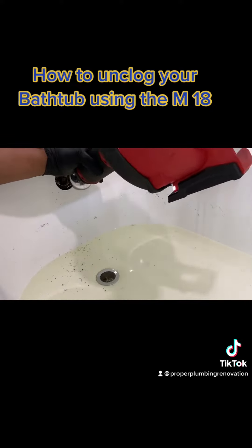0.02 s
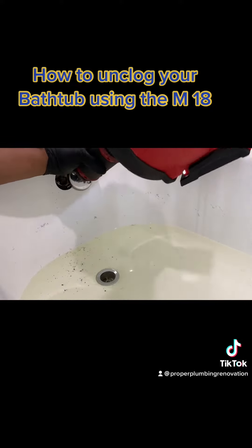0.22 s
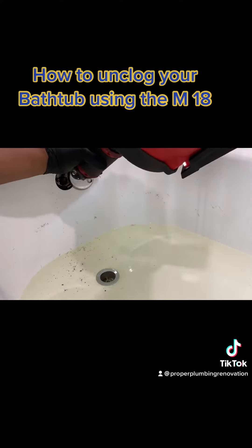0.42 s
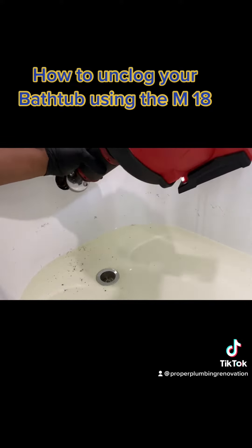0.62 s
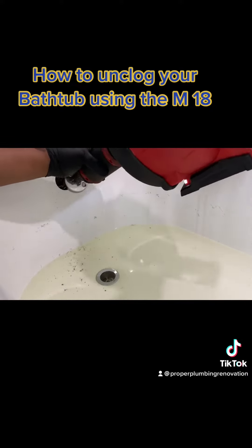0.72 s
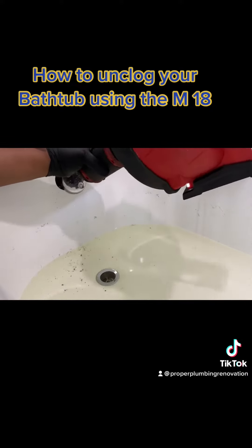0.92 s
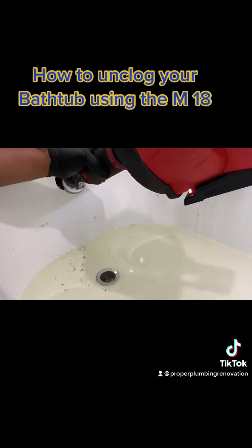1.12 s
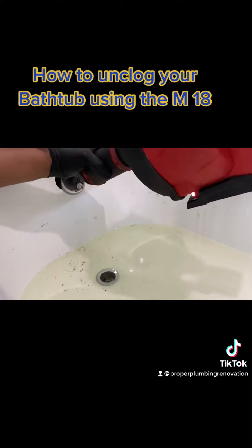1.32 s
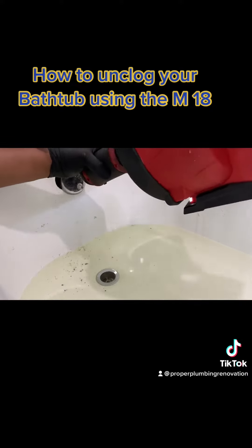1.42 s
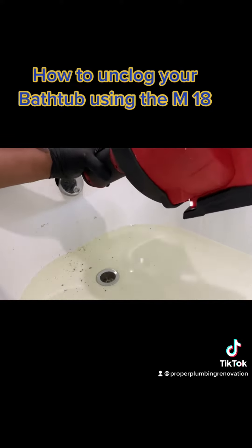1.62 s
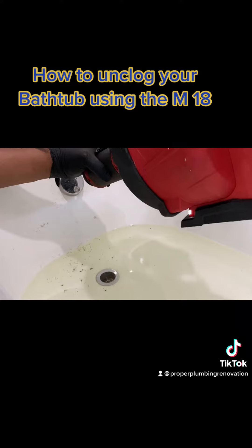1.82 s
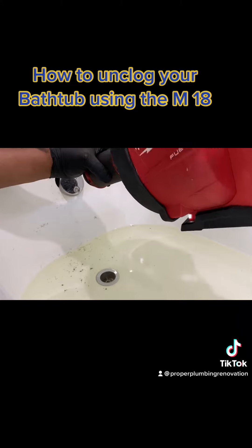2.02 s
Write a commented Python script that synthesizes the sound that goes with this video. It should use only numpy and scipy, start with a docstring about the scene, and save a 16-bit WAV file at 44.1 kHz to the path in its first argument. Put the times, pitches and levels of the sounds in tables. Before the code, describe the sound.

A cordless drain cleaning machine gives one short burst in a small tiled bathroom, close stereo microphone: trigger clicks, quick motor spin-up, steel cable slapping and scraping in the plastic drum, then slowing to a low fading ring.

```python
"""Drain machine burst in a bathroom

A cordless drain cleaning machine runs one short burst over a bathtub: motor tones, gear whirr and glides spin up.
The coiled steel cable, built from dense grains, slaps, scrapes, snaps and squeals in the turning plastic drum.
The drum stops, a low ring of decaying sines hangs on, and the small hard room, a noise tail, dies away."""
import sys
import numpy as np
from scipy import signal
from scipy.fft import rfft, irfft
from scipy.io import wavfile
from scipy.ndimage import uniform_filter1d

SR = 44100
rng = np.random.default_rng(int(sys.argv[2]) if len(sys.argv) > 2 else 0)


def to_wav(sig):
    """Store sig (one row per channel, or 1-D mono) as 16-bit WAV at the path in sys.argv[1].

    Samples outside -1..1 are clipped; the rate is SR.
    """
    pcm = np.clip(np.atleast_2d(sig), -1, 1) * 32767
    pcm = np.round(pcm).astype(np.int16)
    wavfile.write(sys.argv[1], SR, pcm.T)  # frames by channels


N = 92610
T = np.arange(N) / SR

# Cable slaps on the drum: [t/s, hold/s, drum boom level/dB, clatter level/dB, steel scrape level/dB]
CABLE_SLAPS = [(0, 0.0026, -41.5, -37.5, -45.5), (0.02, 0.098, -49.5, -58, -68.5),
               (0.179, 0.037, -46, -46.5, -54), (0.317, 0.0031, -20.5, -24.5, -37),
               (0.353, 0.014, -34, -26, -36), (0.391, 0.02, -27, -24, -42),
               (0.433, 0.036, -29, -23.5, -21.5), (0.481, 0.028, -47, -32, -32),
               (.531, .011, -26, -20, -20.5), (0.569, 0.016, -27, -33, -31),
               (0.598, 0.016, -24.5, -27, -27.5), (.645, .021, -28.5, -29, -31),
               (.714, 0.015, -26.5, -27.5, -32.5), (0.764, .013, -27.5, -29, -32.5),
               (0.786, 0.037, -28.5, -33, -36), (0.927, .018, -25.5, -25.5, -32),
               (1.094, 0.012, -29, -35, -47), (1.124, 0.019, -27.5, -34, -38),
               (1.157, 0.0079, -29, -21, -31.5), (1.18, 0.0073, -27, -27.5, -31),
               (1.275, 0.021, -28.5, -33.5, -40), (1.327, 0.02, -31, -23, -24.5),
               (1.482, .014, -26.5, -30, -36), (1.503, 0.031, -50, -29, -29.5),
               (1.531, 0.012, -24.5, -19.5, -21.5), (1.626, 0.041, -28.5, -30, -32.5),
               (1.707, 0.034, -31, -42.5, -44), (1.754, 0.016, -26.5, -24.5, -26),
               (1.798, 0.013, -29, -33, -53), (1.902, .008, -55.5, -59, -61)]
# Spectrum of the drum boom: [f/Hz, relative level/dB]
BOOM_SPECTRUM = [(20, -20), (70, -13.5), (115, -12), (170, -3), (250, 1), (350, -2), (450, -10),
                 (900, -49.5)]
# Spectrum of the cable clatter: [f/Hz, relative level/dB]
CLATTER_SPECTRUM = [(250, -18), (430, -6.5), (540, 3), (700, -5.5), (1100, -0.5), (1800, -1.5), (2600, -10),
                    (6000, -37)]
# Spectrum of the scraping and snapping steel: [f/Hz, relative level/dB]
STEEL_SPECTRUM = [(900, -34), (2200, -2), (3200, -1), (5000, -3), (6500, -4.5), (8500, -4.5),
                  (12000, -12.5), (15500, -22)]
# Resonances of the drum: [f/Hz, width/Hz, lift/dB]
DRUM_RESONANCES = [(160, 37, 9.5), (305.3, 11, 7), (579.6, 12.6, 3), (806, 96, 10), (1106, 14, 3.5),
                   (2746, 200, 1.5)]
# Sharp steel clicks of the coils and trigger: [t/s, level/dB before CLICK_TRIM_DB]
STEEL_CLICKS = [(.114, -46.5), (0.149, -46), (0.3204, -10), (0.4031, -9), (0.437, -21), (0.545, -22),
                (0.653, -17.5), (.936, -16), (1.1626, -16), (1.1708, -15.5), (1.284, -18.5), (1.339, -19.5),
                (1.493, -22), (1.717, -29.5)]
# Low thumps as the machine jolts: [t/s, level/dB]
JOLTS = [(.128, -39), (0.714, -36), (0.923, -29), (1.535, -28.5)]
# Course of the motor: [t/s, shaft speed f/Hz, gear whirr level/dB, shaft hum level/dB]
MOTOR_COURSE = [(0.144, 69.7, -49, -70), (.149, 81.5, -37.5, -59), (.2, 128.4, -37.5, -60),
                (0.266, 193.6, -28, -58), (.3, 233.5, -26, -32), (.37, 263.5, -26, -28),
                (0.439, 309.4, -27.5, -21), (0.521, 318.8, -35.5, -41), (.66, 318, -32.5, -33),
                (.74, 320.1, -33, -53.5), (0.849, 316.3, -32, -44), (.99, 317.7, -32.5, -40),
                (1.03, 312.6, -32, -32.5), (1.14, 312.8, -32, -35.5), (1.221, 310.7, -32.5, -53.5),
                (1.318, 305.1, -34, -24.5), (1.381, 279, -33.5, -52), (1.452, 236.6, -37.5, -39),
                (1.528, 188.1, -44.5, -43.5), (1.781, 121, -32.5, -66), (1.859, 59.7, -54, -68.5)]
# Gear tones: [multiple of shaft speed, level/dB re whirr]
GEAR_PARTIALS = [(2.89, -14), (7.6, -25.5), (8.0, -21.5)]
# Spectrum of the gear whirr: [f/Hz, relative level/dB]
WHIRR_SPECTRUM = [(60, -9.5), (160, 9.5), (260, -2), (450, 3), (820, 6.5), (1350, -5), (2100, -1.5),
                  (2700, 0), (4200, -1.5), (6000, -9), (9000, -13), (15500, -34.5)]
# Resonances of the gear housing: [f/Hz, width/Hz, lift/dB]
HOUSING_RESONANCES = [(2420, 90, 6), (2650, 94, 6)]
# Short gliding tones, rising gear whine and cable squeals: [t/s, length/s, first f/Hz, last f/Hz, level/dB]
GLIDING_TONES = [(0.147, 0.053, 721, 830, -40.5), (.22, 0.025, 750, 718, -32),
                 (0.313, .04, 530, 584, -29.5), (0.343, .04, 636, 753, -22), (.411, 0.017, 819.5, 890, -19),
                 (0.432, .05, 807, 774, -26), (1.33, 0.028, 808.5, 769, -18),
                 (1.351, 0.035, 810, 819, -24.5), (1.401, 0.043, 809, 678, -32),
                 (.468, 0.032, 5814, 5790, -28)]
# Hard knocks that set the drum ringing: [t/s, wall level/dB, steel level/dB]
DRUM_KNOCKS = [(.538, -26, -23), (.602, -22, -45), (0.813, -21.5, -34), (.941, -21, -39),
               (1.167, -17.5, -28), (1.544, -17, -19.5), (1.768, -27, -34)]
# Modes of the drum wall: [f/Hz, level/dB re knock, t60/s]
DRUM_WALL_MODES = [(166.4, 0.5, 0.18), (296, -6.5, .26)]
# Modes of the steel in the drum: [f/Hz, level/dB re knock, t60/s]
DRUM_STEEL_MODES = [(1059, -2, 0.13), (1364, -2.5, .11), (1477, -5, 0.078), (1790, -7.5, 0.11),
                    (2708, -9.5, 0.12)]
# Modes that ring on after the last blow: [f/Hz, level/dB, t60/s]
RING_MODES = [(377, -28, 0.48), (304, -41.5, 1), (941, -27, 0.2)]
# Spectrum of the quiet room: [f/Hz, relative level/dB]
FLOOR_SPECTRUM = [(20, -13), (70, 1.5), (150, -8.5), (330, -10.5), (500, -11.5), (800, -16), (1300, -26),
                  (3000, -28.5), (7000, -45.5), (16000, -51)]
# Reverberation time of the bathroom: [f/Hz, t60/s]
BATHROOM_T60 = [(100, 0.54), (1000, 0.3), (3000, 0.23), (8000, 0.21), (15000, 0.14)]
# Reverberation of the bathroom: [f/Hz, level/dB re direct sound, before each source's offset]
BATHROOM_LEVEL = [(100, -10), (300, -1), (1000, 0), (4500, -3.5), (9000, -3)]
# Lag of the right port behind the left: [f/Hz, phase/rad]
RIGHT_PORT_LAG = [(500, 0.11), (2000, 0.33), (4000, 1.35), (8000, 1.53), (12000, 7.6)]
# Lean of the whole picture: [f/Hz, left minus right level/dB]
STEREO_LEAN = [(170, 2), (700, 4), (2800, 3.5), (5600, 2), (10000, -0.5)]

# Slap envelope
RISE_S, RELEASE_S = 0.007, 0.0094
# Density and unevenness of the cable and gear grains
SCRAPE_PER_S, SCRAPE_SPREAD_DB, TEETH_PER_S, TEETH_SPREAD_DB = 5000, 1, 7000, 3
PATCH_DB = 3  # how strongly narrow bands come and go
CLICK_DECAY_S, CLICK_TRIM_DB = 0.0023, -1.5
PING_HZ, PING_WIDTH_HZ, PING_LIFT_DB = 4390, 160, 8
THUMP_HZ, THUMP_PEAK_S = 80, 0.0078
# Fraction of speed waver and its rate; fractions of tone roughness and of throb once per turn
WAVER, WAVER_HZ, TONE_ROUGH, ONCE_PER_TURN = .025, 45, .5, .35
BRIGHT_HZ = 5000  # the whirr above this follows the shaft speed
GLIDE_WIDTH_HZ, GLIDE_ROUGH = 14, .2
WALL_RISE_S, STEEL_RISE_S = 0.005, 0.0022
RING_START_S, RING_RISE_S = 1.775, 0.022
FLOOR_DB = -51.5
EARLY_DB, EARLY_DECAY_S = 2.5, 0.0035  # quick reflections, level re tail
# Reverberation offsets; the tones also lean further left
CLICK_ROOM_DB, TONE_ROOM_DB, TONE_LEAN_DB = -4.5, -7, 3.5
EDGE_HZ = 16000


def amp(db):
    """Decibels to gain."""
    return 10 ** (np.asarray(db) / 20)


def unit(x):
    """Scales to rms 1."""
    return x / np.sqrt(np.mean(x ** 2) + 1e-20)


def read(points, hz):
    """Reads a curve on a log-frequency axis."""
    f, value = np.transpose(points)
    return np.interp(np.log(hz + 1), np.log(f + 1), value)


def drift(hz):
    """Slow chance up to a rate, rms 1."""
    spectrum = rfft(rng.standard_normal(N))
    return unit(irfft(spectrum / (1 + (np.fft.rfftfreq(N, 1 / SR) / hz) ** 4), N))


def colour(x, points, modes=()):
    """Causal filter of unit energy, with resonances standing out of its slope."""
    hz = abs(np.fft.fftfreq(16384, 1 / SR))
    peaks = sum((amp(db) - 1) / (1 + (2 * (hz - f) / width) ** 2) for f, width, db in modes)
    gain = amp(read(points, hz)) * (1 + peaks)
    # minimum phase: the phase follows from the log gain, so nothing sounds ahead of its cause
    minimum_phase = np.exp(np.conj(signal.hilbert(np.log(np.maximum(gain, 1e-5)))))
    taps = np.fft.ifft(minimum_phase).real[:4096]
    return signal.fftconvolve(x, taps / np.linalg.norm(taps))[:N]


def grains(per_s, spread_db):
    """Dense tiny impacts of uneven size, even in level over a few milliseconds."""
    size = rng.standard_normal(N) * amp(spread_db * np.minimum(rng.exponential(1, N), 4))
    impacts = size * (rng.random(N) < per_s / SR)
    return impacts / np.sqrt(abs(uniform_filter1d(impacts ** 2, size=400)) + 1e-6)


def shifting(x):
    """Narrow bands swell and fade in random patches, as if resonances came and went."""
    z = signal.stft(x, nperseg=512)[2]
    across_bands = uniform_filter1d(rng.standard_normal(z.shape), size=2, axis=0)
    patches = unit(uniform_filter1d(across_bands, size=7, axis=1))
    return signal.istft(z * unit(amp(PATCH_DB * patches)), nperseg=512)[1][:N]


def cable():
    """Each slap is a flurry of coil impacts that booms, clatters and scrapes in the drum."""
    power = np.zeros((3, N))
    for start, hold, *levels_db in CABLE_SLAPS:
        attack = np.clip((T - start) / RISE_S, 0, 1)
        release = np.exp(-np.maximum(T - start - RISE_S - hold, 0) / RELEASE_S)
        power += (amp(levels_db)[:, None] * attack * release) ** 2
    boom, clatter, steel = np.sqrt(power)
    impacts = np.zeros(N)
    for push, points in ((clatter, CLATTER_SPECTRUM), (steel, STEEL_SPECTRUM)):
        impacts += colour(push * grains(SCRAPE_PER_S, SCRAPE_SPREAD_DB), points, DRUM_RESONANCES)
    # the boom is noise with its own swells evened out
    flex = signal.hilbert(colour(rng.standard_normal(N), BOOM_SPECTRUM, DRUM_RESONANCES))
    return shifting(impacts) + boom * unit(flex.real / (abs(flex) + .5))


def clicks():
    """Steel snaps as decaying noise bursts, each with its own short ping."""
    out = np.zeros(N)
    for s, db in STEEL_CLICKS:
        hz = PING_HZ * (1 + rng.normal() / 10)
        snap = rng.standard_normal(N) * (T >= s) * np.exp(-abs(T - s) / CLICK_DECAY_S)
        out += amp(db + CLICK_TRIM_DB) * colour(snap, STEEL_SPECTRUM, [(hz, PING_WIDTH_HZ, PING_LIFT_DB)])
    return out


def thumps():
    """The housing jolts for a cycle or two."""
    out = np.zeros(N)
    for s, db in JOLTS:
        t = np.maximum(T - s, 0)
        swell = t / THUMP_PEAK_S * np.exp(1 - t / THUMP_PEAK_S)
        out += amp(db) * swell * np.sin(2 * np.pi * THUMP_HZ * t)
    return out


def motor():
    """Shaft hum and gear tones follow the shaft, shaken by the uneven load."""
    s, hz, whirr_db, hum_db = np.transpose(MOTOR_COURSE)
    speed = np.interp(T, s, hz) * (1 + WAVER * drift(WAVER_HZ))
    angle = 2 * np.pi * np.cumsum(speed) / SR
    gears = np.zeros(N)
    for multiple, db in GEAR_PARTIALS:
        gears += amp(db) * unit(np.sin(multiple * angle) * (1 + TONE_ROUGH * drift(WAVER_HZ)))
    hum = unit(np.sin(angle) * (1 + TONE_ROUGH * drift(WAVER_HZ)))
    gear_gain = amp(np.interp(T, s, whirr_db, -120, -120))
    hum_gain = amp(np.interp(T, s, hum_db, -120, -120))
    return gear_gain * gears + hum_gain * hum


def whirr():
    """Gear teeth rattle in their housing, a little harder once per turn of the shaft and brighter with speed."""
    s, hz, whirr_db, _ = np.transpose(MOTOR_COURSE)
    speed = np.interp(T, s, hz)
    throb = unit(1 + ONCE_PER_TURN * np.cos(2 * np.pi * np.cumsum(speed) / SR))
    teeth = grains(TEETH_PER_S, TEETH_SPREAD_DB) * throb
    rattle = shifting(colour(teeth, WHIRR_SPECTRUM, HOUSING_RESONANCES))
    dull = signal.sosfiltfilt(signal.butter(2, BRIGHT_HZ, fs=SR, output="sos"), rattle)
    bright = (rattle - dull) * speed / hz.max()
    return amp(np.interp(T, s, whirr_db, -120, -120)) * (dull + bright)


def glides():
    """Short gliding tones: the gear whine rising as the motor spins up, and squeals of the cable on the drum."""
    out = np.zeros(N)
    for start, length, first_hz, last_hz, db in GLIDING_TONES:
        hz = np.interp(T, [start, start + length], [first_hz, last_hz])
        arch = np.sqrt(abs(np.sin(np.pi * np.clip((T - start) / length, 0, 1))))
        turns = np.cumsum(hz + GLIDE_WIDTH_HZ * drift(61.7)) / SR
        out += amp(db) * arch * np.sin(2 * np.pi * turns) * (1 + GLIDE_ROUGH * drift(130))
    return out


def knocks():
    """A hard knock rings the drum wall low and the steel higher up."""
    out = np.zeros(N)
    for s, wall_db, steel_db in DRUM_KNOCKS:
        t = np.maximum(T - s, 0)
        wall = (DRUM_WALL_MODES, wall_db, WALL_RISE_S)
        steel = (DRUM_STEEL_MODES, steel_db, STEEL_RISE_S)
        for modes, level_db, rise_s in (wall, steel):
            onset = np.minimum(t / rise_s, 1)
            for hz, db, t60 in modes:
                tone = np.sin(2 * np.pi * (hz * t + rng.random()))
                out += onset * amp(level_db + db - 60 * t / t60) * tone
    return out


def ring():
    """Low modes hang on after the drum's last hard blow."""
    t = np.maximum(T - RING_START_S, 0)
    modes = sum(amp(db - 60 * t / t60) * np.sin(2 * np.pi * hz * t) for hz, db, t60 in RING_MODES)
    return modes * np.minimum(t / RING_RISE_S, 1)


def bathroom(x, room_db=0):
    """Direct sound at two ports, quick reflections from the tub, and a short tiled tail."""
    count = 32768
    t, hz = np.arange(count) / SR, np.fft.rfftfreq(count, 1 / SR)
    # tail: sparse echoes, each band dying at its own rate
    echoes = rng.choice([-1., 1.], (2, count)) * (rng.random((2, count)) < 3000 / SR) * (t > .004)
    f, frame_s, z = signal.stft(echoes, SR, nperseg=256)
    t60 = read(BATHROOM_T60, f)[:, None]
    decayed = z * amp(-60 * frame_s / t60) / np.sqrt(t60)
    tail = signal.istft(decayed, SR, nperseg=256)[1][:, :count]
    early = rng.standard_normal((2, count)) * (rng.random((2, count)) < 3000 / SR)
    early = early * (t > .0007) * np.exp(-t / EARLY_DECAY_S)
    tail, early = (rfft(v / np.linalg.norm(v, axis=1, keepdims=True)) for v in (tail, early))
    wet = amp(read(BATHROOM_LEVEL, hz) + room_db)
    direct = np.exp(-1j * read(RIGHT_PORT_LAG, hz) * np.array([[0], [1]]))
    paths = (direct + wet * (tail + amp(EARLY_DB) * early)) / np.sqrt(1 + wet ** 2)
    lead = 64  # samples of room for the phase filter to spread ahead of the direct sound
    response = np.roll(irfft(paths), lead, axis=1)
    return signal.fftconvolve(x[None], response, axes=1)[:, lead:lead + N]


def scene():
    """The machine, a little to the left, over the quiet of the room; the drum radiates from several spots."""
    spots = 3
    quiet = np.array([colour(rng.standard_normal(N), FLOOR_SPECTRUM) for side in range(2)])
    drum = sum(bathroom(cable() + whirr()) for spot in range(spots)) / np.sqrt(spots)
    tones = bathroom(motor() + glides() + knocks() + thumps() + ring(), TONE_ROOM_DB)
    tones = tones * amp([[TONE_LEAN_DB / 2], [-TONE_LEAN_DB / 2]])
    mix = drum + tones + bathroom(clicks(), CLICK_ROOM_DB) + amp(FLOOR_DB) * unit(quiet)
    lean = read(STEREO_LEAN, np.fft.rfftfreq(2 * N, 1 / SR))
    gains = amp(np.array([lean, -lean]) / 2)
    gains = gains / np.sqrt((gains ** 2).mean(0))  # lean without changing the total power gain
    return irfft(rfft(mix, 2 * N) * gains)[:, :N]


def record(dry):
    """The recorder's band limit, a steep low-pass."""
    taps = signal.firwin(511, EDGE_HZ, window=("kaiser", 9), fs=SR)
    return signal.oaconvolve(dry, taps[None], "same")


dry = scene()
out = record(dry)
to_wav(out)
```